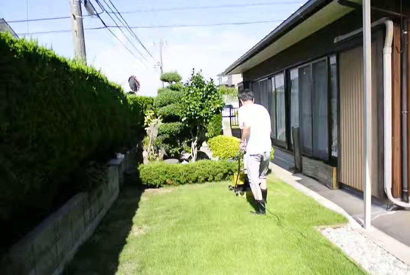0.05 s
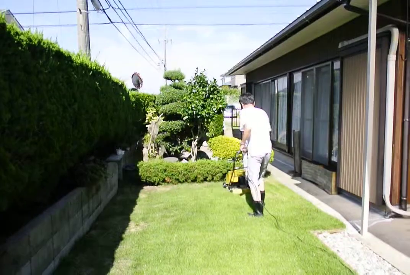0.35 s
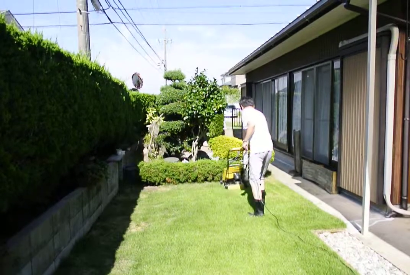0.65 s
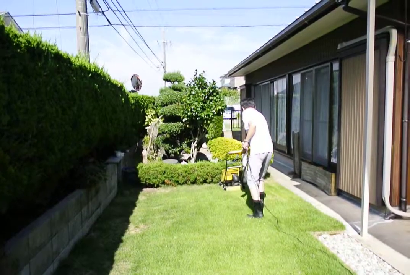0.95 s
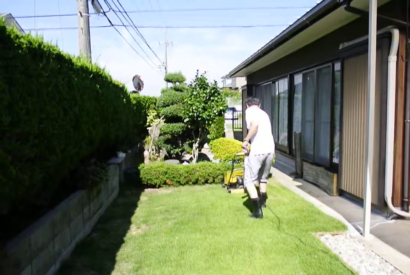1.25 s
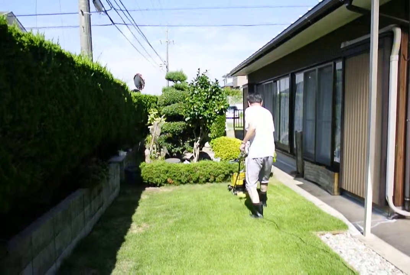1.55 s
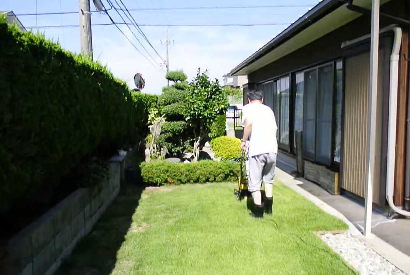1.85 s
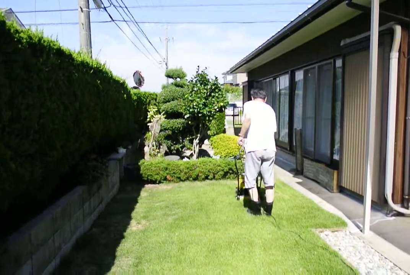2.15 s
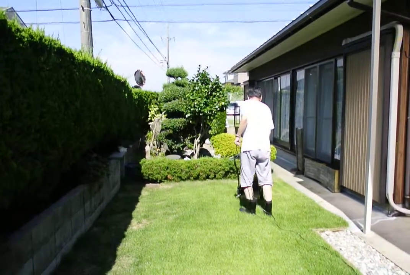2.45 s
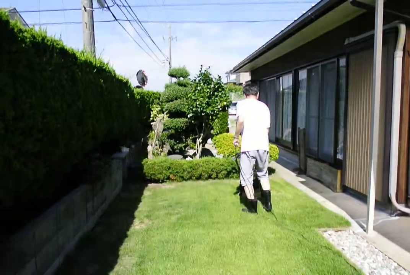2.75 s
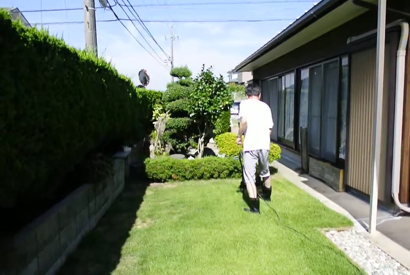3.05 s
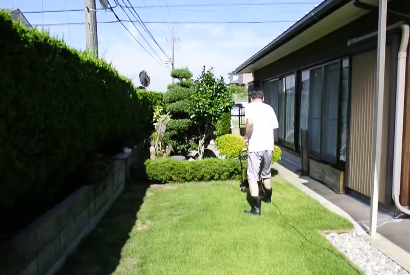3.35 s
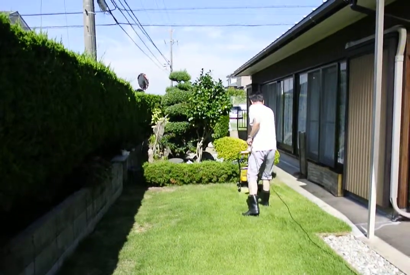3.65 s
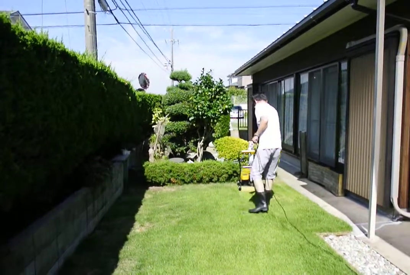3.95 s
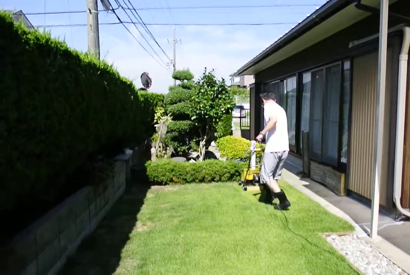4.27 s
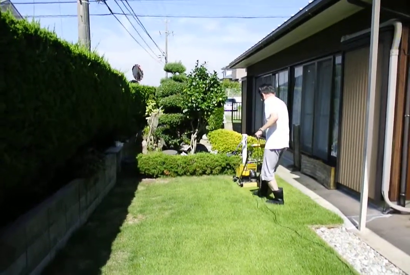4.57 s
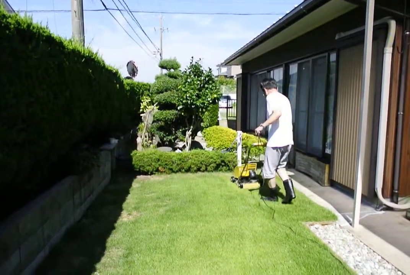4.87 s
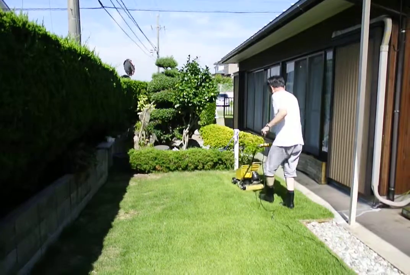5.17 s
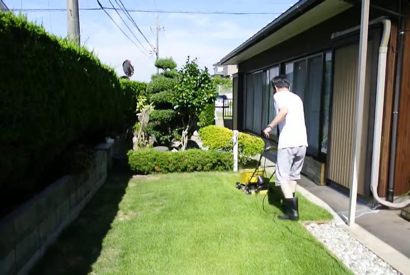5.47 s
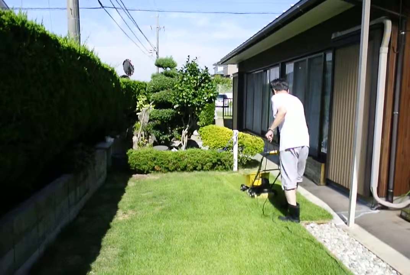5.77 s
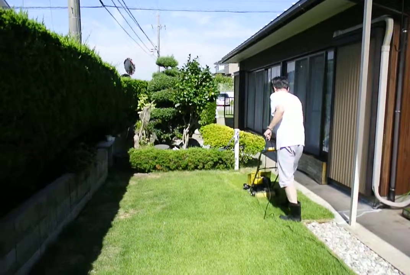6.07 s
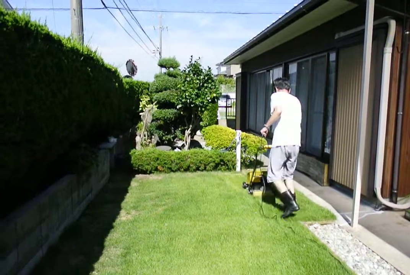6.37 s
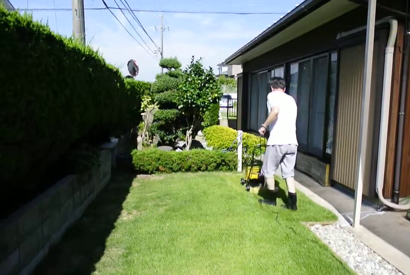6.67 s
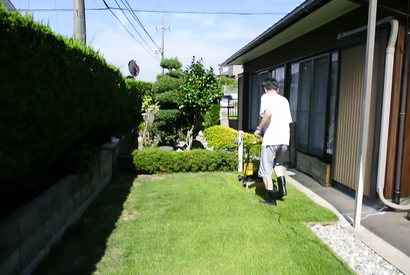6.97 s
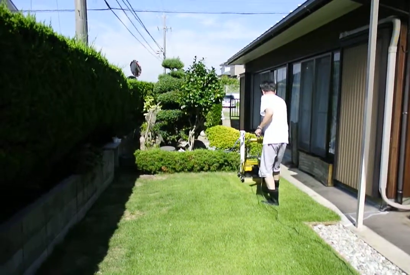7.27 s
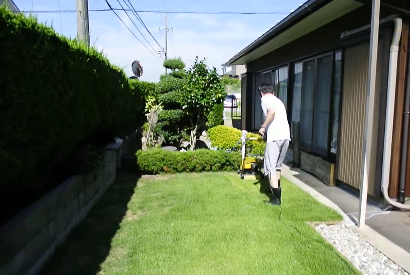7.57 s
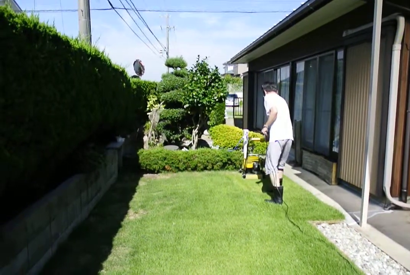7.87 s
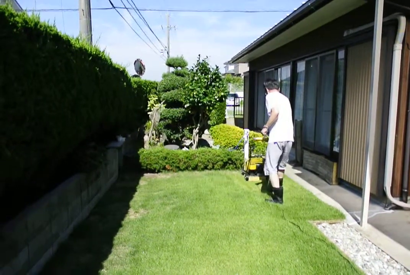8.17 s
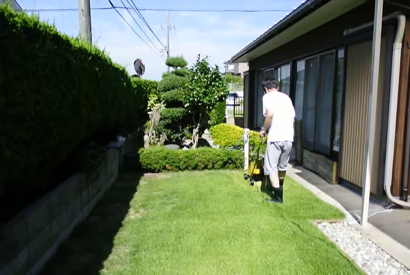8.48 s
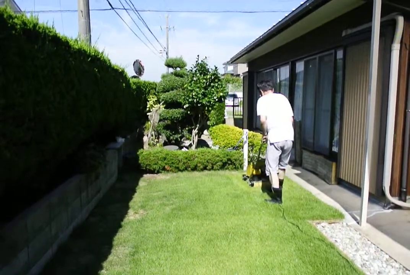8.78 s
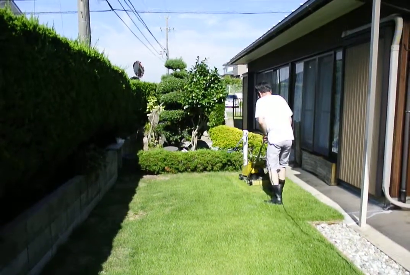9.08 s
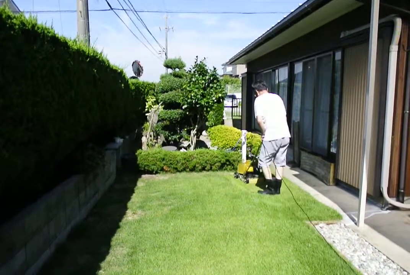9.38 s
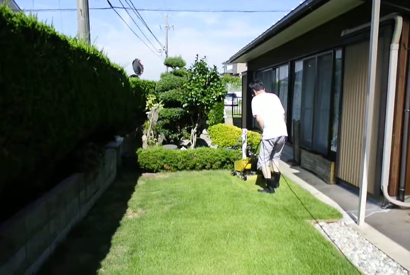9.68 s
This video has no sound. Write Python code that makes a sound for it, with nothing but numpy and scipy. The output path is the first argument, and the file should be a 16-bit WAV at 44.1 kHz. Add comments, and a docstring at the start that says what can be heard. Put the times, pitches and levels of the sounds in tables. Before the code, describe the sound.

An electric lawn mower runs throughout on a small garden lawn, a few metres from the microphone and slightly to the right. Its motor whines at a nearly constant pitch over the hum of the blade and a rush of churned air. Cut grass hisses and patters, the housing rattles in thicker tufts, and the blade twice grazes the deck with a short buzz. Later, faint wind bumps touch the microphone.

```python
"""A small lawn between a hedge and a house: a corded electric mower is pushed to and fro a few metres away.
Its brush motor whines, pulsing with the mains, and drives a two-winged blade through a reduction gear.
The blade hums, churns air under the deck and twice grazes it; thick tufts rattle the housing.
Cut grass patters and hisses against the housing.
A faint low rumble comes at the start; later, wind briefly bumps the microphone."""
import sys
import numpy as np
from scipy import signal
from scipy.fft import rfft, irfft, next_fast_len
from scipy.io import wavfile

SR = 44100
rng = np.random.default_rng(int(sys.argv[2]) if len(sys.argv) > 2 else 0)


def to_wav(sig):
    """Store sig (one row per channel, or 1-D mono) as 16-bit WAV at the path in sys.argv[1].

    Samples outside -1..1 are clipped; the rate is SR.
    """
    pcm = np.clip(np.atleast_2d(sig), -1, 1) * 32767
    pcm = np.round(pcm).astype(np.int16)
    wavfile.write(sys.argv[1], SR, pcm.T)  # frames by channels


N = 429093
TIME = np.arange(N) / SR
START_S = 0.157
LEFT_RIGHT = np.array([[1], [-1]])
# stereo width: (frequency [Hz], side re mid [dB])
STEREO_WIDTH = [(60, -13), (110, -23), (200, -17), (380, -17.5), (700, -15.5), (1200, -11), (1550, -7.5),
                (2200, -12), (3300, -5.5), (4400, -6), (8000, 1), (15000, -7.5)]


def from_db(db):
    """Decibels to gain."""
    return np.exp(np.asarray(db) * (np.log(10) / 20))


def rms_one(x):
    """Scale to unit power."""
    return x / np.sqrt(np.mean(np.abs(x) ** 2) + 1e-20)


def in_time(rows):
    """Curve through rows of (time [s], value)."""
    return np.interp(TIME, *np.transpose(rows))


def at_hz(spectrum, hz):
    """Read a spectrum on a log-frequency axis."""
    knots_hz, db = np.transpose(spectrum)
    return np.interp(np.log(hz), np.log(knots_hz), db)


def swells(rows):
    """Sum of Gaussian bumps from rows of (time [s], sigma [s], peak [dB])."""
    return sum(from_db(db) * np.exp(-.5 * ((TIME - at_s) / sigma_s) ** 2) for at_s, sigma_s, db in rows)


def drift(rate_hz):
    """Slow random curve of unit spread."""
    hop, settle = 100, 1000
    pole = np.exp(-2 * np.pi * rate_hz * hop / SR)
    noise = rng.standard_normal(N // hop + settle + 2)
    slow = rms_one(signal.lfilter([1], [1, -2 * pole, pole * pole], noise)[settle:])
    return np.interp(np.arange(N) / hop, np.arange(len(slow)), slow)


def grains(per_s, size_db):
    """Two independent streams of tiny, uneven impacts."""
    sizes = from_db(size_db * np.minimum(rng.exponential(1, (2, N)), 5))
    hits = rng.random((2, N)) < per_s / SR
    return rms_one(hits * sizes * rng.standard_normal((2, N)))


def coloured(pair, spectrum):
    """Shape two independent excitations into stereo with a mid of rms 1."""
    size = next_fast_len(N)
    hz = np.maximum(np.fft.rfftfreq(size, 1 / SR), 1)
    shape = from_db(at_hz(spectrum, hz))
    mid = irfft(rfft(pair[0], size) * shape, size)[:N]
    side = irfft(rfft(pair[1], size) * shape * from_db(at_hz(STEREO_WIDTH, hz)), size)[:N]
    return (mid + side * LEFT_RIGHT) / np.std(mid)


def partial(angle, level_db, flutter, flutter_hz, spread_db):
    """Tone of a rotating part: turbulence shakes it, shifting echoes turn its phase at each ear."""
    hz = (angle[-1] - angle[0]) / (2 * np.pi * TIME[-1])
    echo_rad = drift(.5) * np.clip(hz / 3000, 0, 1)
    angle = angle + echo_rad + 2 * np.pi * rng.random()
    cos, sin = np.cos(angle), np.sin(angle)
    turbulence = drift(flutter_hz) * cos + drift(flutter_hz) * sin
    mid = (cos + flutter * turbulence) / np.sqrt(1 + 2 * flutter ** 2)
    side = from_db(at_hz(STEREO_WIDTH, hz) + spread_db) * np.cos(angle + 3.03 * drift(0.48))
    return np.sqrt(2) * from_db(level_db) * np.array([mid + side, mid - side])


def blade_wobble(wing):
    """Slight imbalance: one cycle per blade turn."""
    return partial(wing / 2, -63.5, flutter=0.45, flutter_hz=5.3, spread_db=-4)


def blade_hum(wing, load_db):
    """Each wing passing the rim gives a pressure pulse; harmonics 2-4 rise and fall unevenly."""
    # harmonics 2, 3, 4: (time [s], level [dB])
    second = [(0.52, -46.5), (1.14, -53), (1.24, -36), (1.54, -45.5), (2.12, -31), (2.42, -36),
              (3.48, -34.5), (3.66, -42), (4.64, -38.0), (4.74, -30), (5.56, -31), (5.94, -36.5),
              (7.08, -31), (8.1, -49.5), (8.52, -31), (9.72, -31)]
    third = [(0.52, -32.5), (1.22, -36), (1.48, -30.5), (2.02, -37), (2.16, -45.7), (2.86, -29.5),
             (5.08, -27), (5.3, -44), (5.56, -30), (6.22, -37), (6.48, -46), (6.82, -28), (7.64, -32.5),
             (7.78, -56), (8.04, -29), (8.34, -41), (8.48, -29.5), (9.72, -31.5)]
    fourth = [(0.52, -33.5), (0.94, -28), (1.32, -31.5), (1.78, -23.9), (3.0, -20), (3.26, -26.5),
              (3.64, -26.3), (3.94, -36), (4.56, -26.5), (4.86, -30.5), (5.08, -25), (5.74, -32),
              (6.52, -24), (6.9, -29.5), (7.52, -23), (7.82, -30.5), (8.12, -24.5), (9.72, -23)]
    # steadier harmonics: (order [x wing rate], level at mean load [dB])
    steady = [(1, -49.5), (5, -43.5), (6, -44.5), (7, -45.5), (8, -42.5), (9, -48), (10, -47.5)]
    hum = partial(2 * wing, in_time(second) - .2, flutter=0.46, flutter_hz=17, spread_db=-10)
    hum += partial(3 * wing, in_time(third) - .2, flutter=0.6, flutter_hz=10.5, spread_db=-11)
    hum += partial(4 * wing, in_time(fourth) - .3, flutter=0.23, flutter_hz=14.4, spread_db=-8)
    for order, db in steady:
        hum += partial(order * wing, db + 0.74 * load_db, flutter=.65, flutter_hz=6, spread_db=-1)
    return hum


def blade_buzz(wing, load_db):
    """Wing pulses buzz in the housing; a graze makes a few harmonics ring louder and steadier."""
    # upper harmonics: (order [x wing rate], level re buzz [dB], level re graze [dB])
    harmonics = [(11, -9, -24), (12, -5.5, 1.5), (13, -16, -13), (14, -6.5, -20), (15, -2.5, -20),
                 (16, -6, -22), (17, -8, 0.5), (18, -14, -22), (19, -9.5, -2), (20, -6, -20), (21, -7, -20),
                 (22, -7, -20), (25, -19, -25)]
    # blade grazes the deck: (time [s], sigma [s], peak [dB])
    grazes = [(2.32, .11, -31), (5.35, .08, -36)]
    buzz = from_db(-38.5 + 0.7 * load_db)
    graze = swells(grazes)
    out = np.zeros((2, N))
    for order, buzz_db, graze_db in harmonics:
        rough = buzz * from_db(buzz_db)
        gain = np.hypot(rough, graze * from_db(graze_db))
        out += gain * partial(order * wing, 0, flutter=.2 + .5 * rough / gain, flutter_hz=6, spread_db=-1)
    return out


def cooling_fan(rotor):
    """Fan tone at 8 cycles per motor turn, swelling now and then."""
    # fan swells: (time [s], sigma [s], peak [dB])
    fan_swells = [(1.78, 0.18, -39), (3.45, .13, -33), (4.7, 0.22, -35), (7.55, 0.15, -39),
                  (7.98, 0.21, -33)]
    gain = from_db(-44) + swells(fan_swells)
    return gain * partial(8 * rotor, 0, flutter=0.45, flutter_hz=14, spread_db=-20)


def casing_db(angle):
    """Boost of a motor tone gliding through the casing's resonances."""
    # resonances: (centre [Hz], width [Hz], boost [dB])
    resonances = [(2588, 22, 7), (3888, 50, 9), (3955, 25, 3), (4042, 28, 4), (11640, 70, 9),
                  (12050, 110, 6)]
    hz = np.gradient(angle) * SR / (2 * np.pi)
    return sum(db / (1 + (2 * (hz - centre) / width) ** 2) for centre, width, db in resonances)


def motor_whine(rotor, torque, load_db):
    """Rotor, bearings and 15 armature slots sing; current peaks add sidebands that grow under load."""
    # the whine swells and fades: (time [s], gain [dB])
    whine_gain = [(0.52, -0.7), (1.22, 1.9), (1.44, -4), (1.8, 3), (1.98, -5.5), (2.88, 0.8), (4.38, -3.5),
                  (4.8, 5), (5.34, -5), (5.64, 2.5), (5.82, -1.0), (7.04, 2.1), (7.18, -3), (8.36, 2),
                  (8.66, -0.5), (9.36, -2.5), (9.48, 4.5), (9.72, -0.6)]
    # slot tone and sidebands: (offset [x torque rate], level [dB], load share [dB/dB])
    whine_bands = [(-2, -55, 1.2), (-1, -41.5, 0.44), (0, -36.5, 0.16), (1, -41.5, 1.2), (2, -52, .8)]
    # thin sizzle round the third slot harmonic: (offset [x torque rate], level [dB])
    sizzle_bands = [(-1, -61), (0, -48.5), (1, -58)]
    # rotor and bearing tones: (order [x motor speed], level [dB])
    rotor_tones = [(3, -46), (5, -48), (7, -51), (7.3, -49), (8.3, -47), (10, -41.5), (11, -45)]
    slots = 15 * rotor
    whine_db = in_time(whine_gain)
    out = partial(rotor, -42.5, flutter=0.12, flutter_hz=5.7, spread_db=-18)
    for offset, db, load_share in whine_bands:
        angle = slots + offset * torque
        level_db = db + whine_db + load_share * load_db + casing_db(angle)
        out += partial(angle, level_db, flutter=0.3, flutter_hz=12, spread_db=-2.5)
    for offset, db in sizzle_bands:
        angle = 3 * slots + offset * torque
        out += partial(angle, db + casing_db(angle), flutter=.4, flutter_hz=18, spread_db=4)
    for order, db in rotor_tones:
        angle = order * rotor
        out += partial(angle, db - .8 + casing_db(angle), flutter=0.79, flutter_hz=8.7, spread_db=2.5)
    return out


def churned_air(wing, load_db):
    """Turbulence under the deck, pulsing with each wing."""
    # air noise: (frequency [Hz], density [dB])
    air_spectrum = [(25, -52), (55, -25), (100, -24), (170, -13.5), (250, -4.5), (380, -0.5), (480, -2),
                    (590, 1), (760, -4.5), (1100, -9), (1500, -18.5), (3000, -27.5)]
    # the deck dips, air surges: (time [s], sigma [s], peak re steady air [dB])
    surges = [(1.97, .025, -7), (3.54, 0.028, -13), (4.62, .02, -11), (7.05, 0.02, -12), (7.65, 0.034, -12),
              (8.55, .02, -11)]
    air = rng.standard_normal((2, N)) * (1 + 0.14 * np.cos(wing)) * from_db(0.81 * drift(13))
    return from_db(-27.5 + 0.12 * load_db) * (1 + swells(surges)) * coloured(air, air_spectrum)


def housing_rattle(torque, load_db, tufts, bites):
    """The housing rattles with the torque pulses, harder when the blade bites."""
    # rattle: (frequency [Hz], density [dB])
    rattle_spectrum = [(500, -23), (1000, -8.5), (1250, -1), (1500, -7), (1800, -3), (2100, 1),
                       (2700, -0.5), (3300, -5), (4200, -4.5), (6000, -12), (10000, -32)]
    rattle = rng.standard_normal((2, N)) + 0.43 * grains(per_s=3000, size_db=4.5)
    rattle *= (1 + 0.048 * np.cos(torque)) * from_db(0.54 * tufts)
    return from_db(-28.5 + 0.54 * load_db) * (1 + bites) * coloured(rattle, rattle_spectrum)


def clippings(torque, load_db, tufts, bites):
    """Cut grass patters and hisses against the housing."""
    # grass hiss: (frequency [Hz], density [dB])
    grass_spectrum = [(1500, -25), (3500, 3), (4800, 1.5), (6000, 1.5), (7200, 0.5), (8500, 0), (9600, 1),
                      (11400, -1), (13200, 2.5), (14200, 0), (16000, 0)]
    grass = rng.standard_normal((2, N)) + 0.26 * grains(per_s=5000, size_db=1.0)
    grass *= (1 + 0.057 * np.cos(torque)) * from_db(0.83 * tufts)
    return from_db(-28.5 + load_db) * (1 + 0.11 * bites) * coloured(grass, grass_spectrum)


def low_rumbles():
    """A faint low rumble at the start, then brief wind bumps on the microphone."""
    # rumbles: (time [s], sigma [s], peak [dB])
    rumbles = [(.7, .3, -57), (5.92, .03, -45), (6.06, .06, -52), (8.9, .12, -56), (9.68, .08, -55)]
    # (frequency [Hz], density [dB])
    rumble_spectrum = [(15, -14), (55, 1), (90, -1), (200, -21), (1000, -70)]
    return swells(rumbles) * coloured(rng.standard_normal((2, N)), rumble_spectrum)


def place_right(x, lag_s=16e-6, pan_db=-0.3):
    """The mower is slightly to the right: later and softer on the left."""
    size = next_fast_len(N + 16)
    delay = np.exp(-2j * np.pi * np.fft.rfftfreq(size, 1 / SR) * lag_s)
    left = irfft(rfft(x[0], size) * delay, size)[:N]
    return np.array([left, x[1]]) * from_db(pan_db * LEFT_RIGHT)


def scene():
    """One shaft speed drives motor, gear and blade; the amount of grass sets the load."""
    # motor speed, sagging in thick grass: (time [s], speed [rev/s])
    motor_speed = [(0.16, 259.6), (0.7, 263.2), (1.12, 267.1), (1.48, 266.5), (1.81, 268.8), (2.54, 262.1),
                   (3.0, 266.1), (3.4, 268.0), (3.9, 264.9), (4.74, 269.3), (5.42, 266.5), (5.94, 259.2),
                   (6.38, 258.4), (7.5, 265.0), (7.78, 262.6), (8.48, 266.5), (8.68, 263.5), (9.15, 265.2),
                   (9.73, 270.4)]
    # amount of grass being cut: (time [s], level [dB])
    cutting = [(0.52, -28), (1.42, -26), (1.68, -28), (2.02, -25), (2.96, -29.5), (3.46, -28.5),
               (3.56, -26.5), (4.1, -29), (4.32, -27), (5.54, -25), (5.64, -24), (6.9, -27.5), (7.4, -26.5),
               (7.66, -23.5), (7.84, -26.5), (8.04, -24.5), (8.18, -26.5), (9.72, -27.7)]
    # blade bites a thick tuft: (time [s], sigma [s], peak re steady rattle [dB])
    tuft_bites = [(1.96, 0.033, -14), (3.6, 0.023, -4), (3.76, .03, -10), (5.32, 0.039, -10),
                  (5.49, .025, -6.5), (5.65, 0.031, -4), (6.1, 0.18, -10), (8.05, 0.066, -22),
                  (8.53, .04, -7)]
    gear_ratio, mains_hz = 21 / 80, 60
    speed_hz = in_time(motor_speed) * (1 + .0004 * drift(9))
    rotor = 2 * np.pi * np.cumsum(speed_hz) / SR   # phases in rad
    wing = 2 * gear_ratio * rotor   # two wings per blade turn
    torque = 2 * np.pi * 2 * mains_hz * TIME   # two current peaks per mains cycle
    load_db = in_time(cutting)
    load_db -= load_db.mean()

    wobble = blade_wobble(wing)
    mower = blade_hum(wing, load_db) + blade_buzz(wing, load_db)
    mower += cooling_fan(rotor) + motor_whine(rotor, torque, load_db)
    tufts = drift(16)   # the blade meets the grass unevenly
    bites = swells(tuft_bites)
    mower += churned_air(wing, load_db)
    mower += housing_rattle(torque, load_db, tufts, bites)
    mower += clippings(torque, load_db, tufts, bites)
    rise_db = np.interp(TIME, [START_S, 0.61], [-8, 0])
    return place_right(from_db(rise_db) * mower + wobble) + low_rumbles()


def record(dry):
    """The sound opens abruptly; the top treble is cut."""
    open_s, cutoff_hz = 0.0011, 15800
    gate = np.clip((TIME - START_S) / open_s, 0, 1)
    lowpass_sos = signal.ellip(12, .1, 90, cutoff_hz, fs=SR, output="sos")
    return signal.sosfilt(lowpass_sos, dry * gate)


dry = scene()
out = record(dry)
to_wav(out)
```